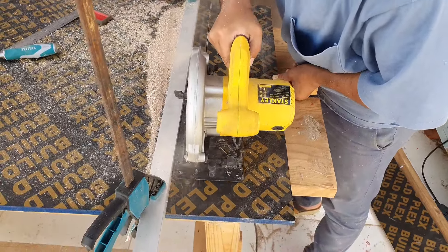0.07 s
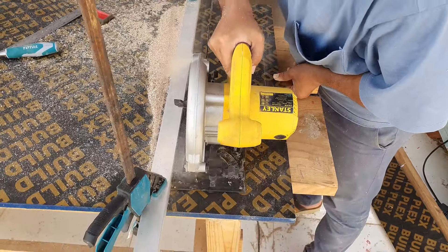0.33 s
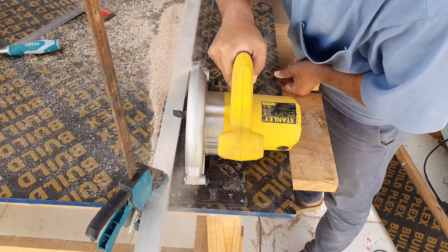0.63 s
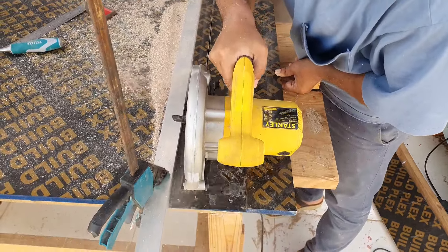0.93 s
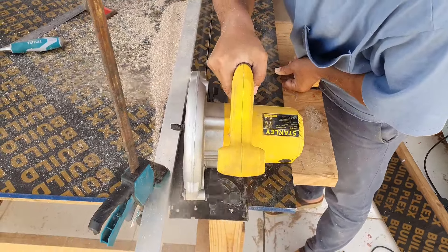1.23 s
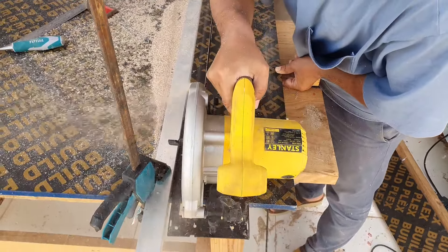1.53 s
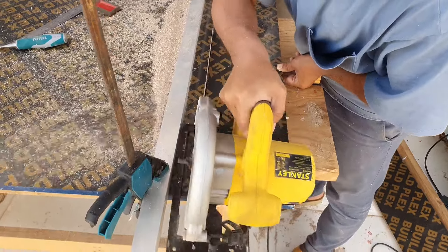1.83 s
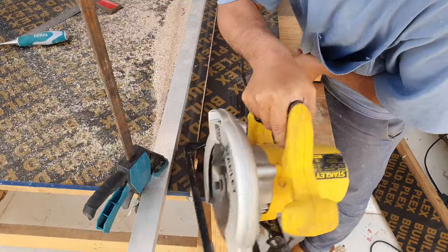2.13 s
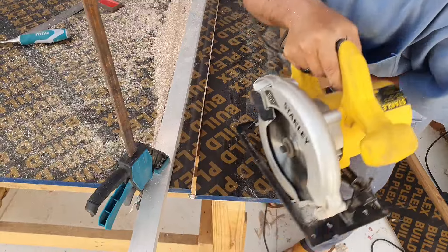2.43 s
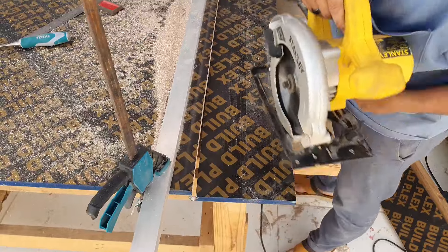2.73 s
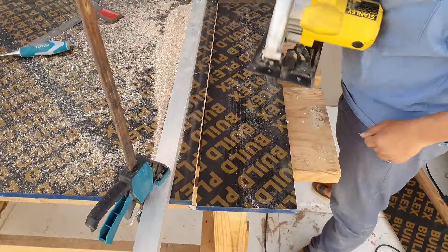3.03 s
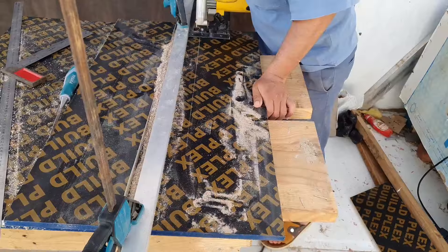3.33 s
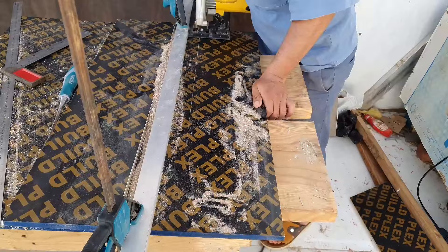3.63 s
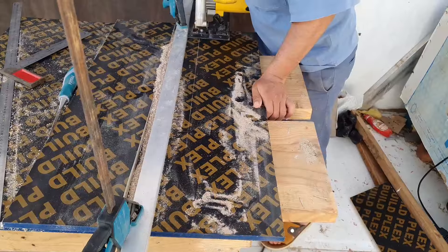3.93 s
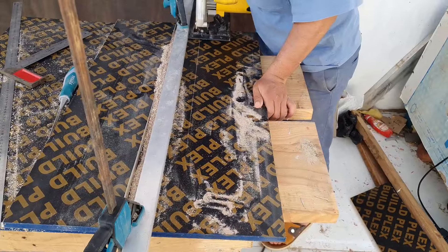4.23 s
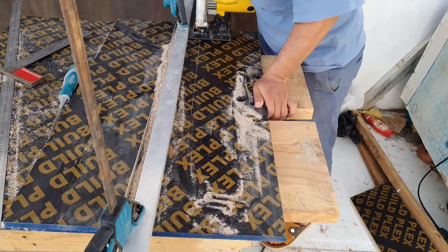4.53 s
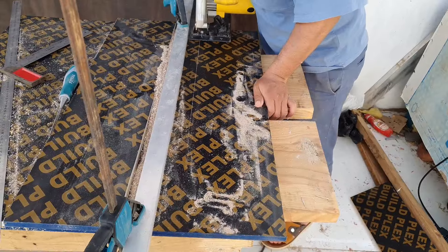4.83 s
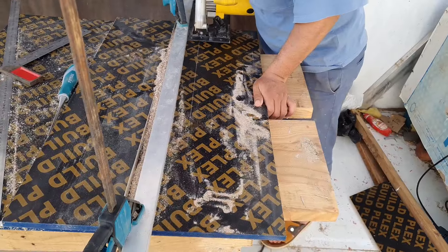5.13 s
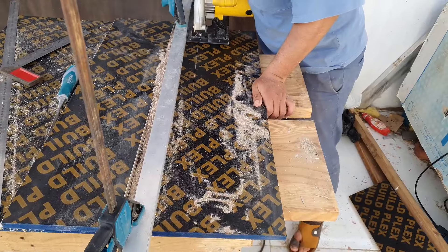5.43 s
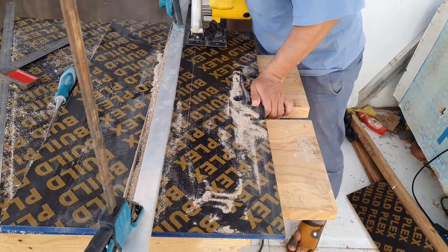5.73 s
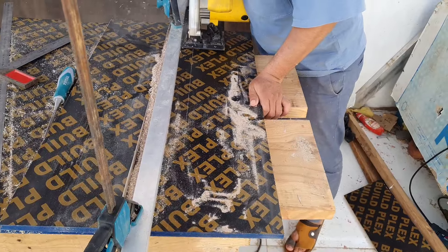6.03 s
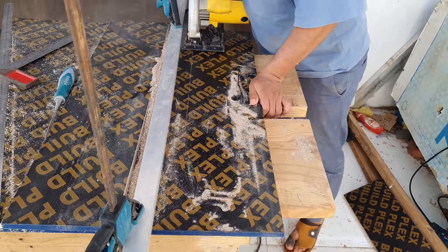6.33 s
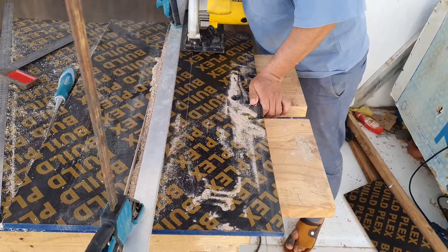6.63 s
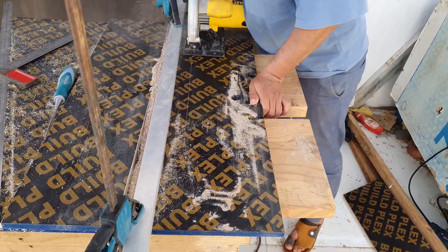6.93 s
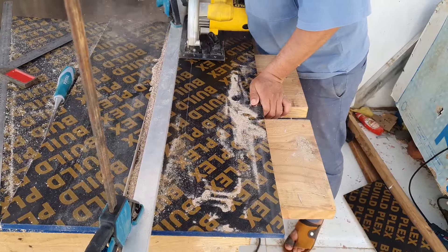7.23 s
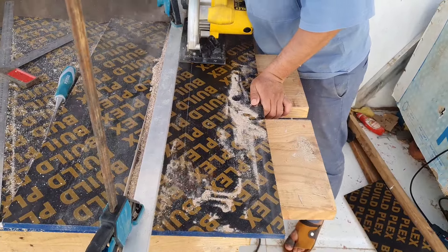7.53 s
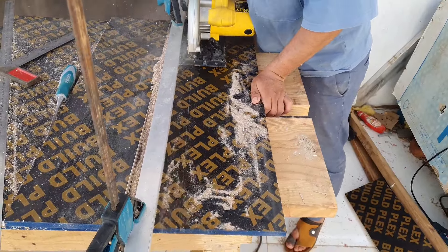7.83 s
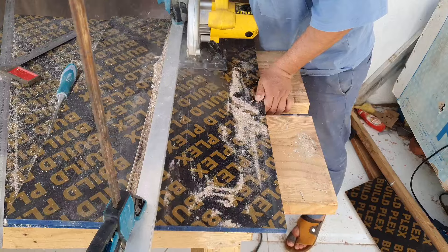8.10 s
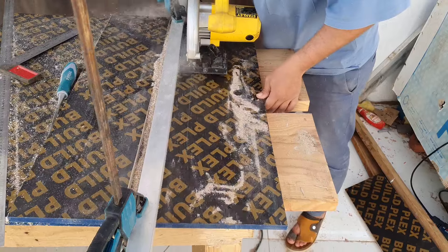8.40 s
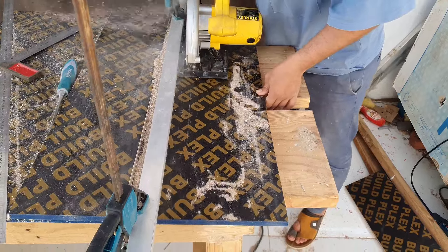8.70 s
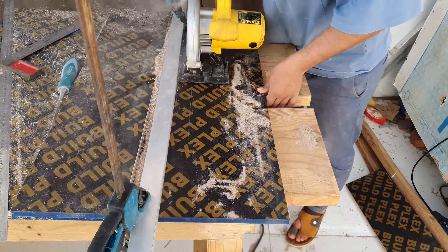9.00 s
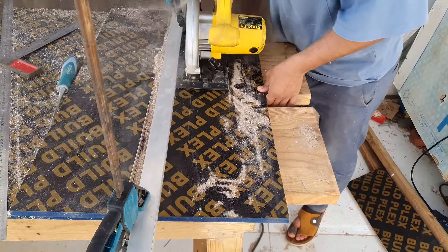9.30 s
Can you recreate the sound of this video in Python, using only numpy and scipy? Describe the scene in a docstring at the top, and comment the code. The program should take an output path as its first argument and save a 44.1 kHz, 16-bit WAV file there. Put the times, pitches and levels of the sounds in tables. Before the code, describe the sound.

An electric circular saw cuts plywood close by, its motor whining over rasping teeth and a ringing steel blade. It leaves the wood with a couple of knocks and slows, its guard rattling. After a few dull bumps, the motor kicks on and races up with grinding gears. The blade bites again and cuts steadily, squealing in bursts as the pitch sinks under load. The workshop adds a short echo.

```python
"""A corded circular saw is cutting plywood: its motor hums, its teeth tear and its steel blade rings.
Near 2 s it leaves the wood with a knock, then slows down while its loose guard rattles.
At 3.2 s the scene jumps to the far end of the sheet. The motor kicks on and races up, its gears grinding.
Near 4.9 s the blade bites in again, and the load drags down the speed of motor, fan and blade together."""
import sys
import numpy as np
from scipy import signal
from scipy.fft import rfft, irfft, next_fast_len
from scipy.io import wavfile
from scipy.ndimage import uniform_filter1d, map_coordinates

SR = 44100
rng = np.random.default_rng(int(sys.argv[2]) if len(sys.argv) > 2 else 0)


def to_wav(sig):
    """Store sig (one row per channel, or 1-D mono) as 16-bit WAV at the path in sys.argv[1].

    Samples outside -1..1 are clipped; the rate is SR.
    """
    pcm = np.clip(np.atleast_2d(sig), -1, 1) * 32767
    pcm = np.round(pcm).astype(np.int16)
    wavfile.write(sys.argv[1], SR, pcm.T)  # frames by channels


N = 417186

JUMP_S, SWITCH_ON_S = 3.2, 3.528  # the second scene begins; the trigger is pulled
GEAR_RATIO, TEETH = 41 / 8, 30  # motor turns for one blade turn; teeth on the blade
MAINS_PULSE_HZ = 100  # the current peaks twice in each mains cycle
USUAL_BITE_DB = -37  # how hard the teeth bite with an ordinary push


def amp(db):
    """Turn decibels into a gain, a number to multiply a sound by."""
    return 10 ** (np.asarray(db) / 20)

def unit(x):
    """Scale x to an average strength (rms) of 1."""
    return x / np.sqrt(np.mean(x ** 2) + 1e-20)

def along(points, hz):
    """Read between rows of (pitch_hz, value), with octaves evenly spaced."""
    pitches, values = np.transpose(points)
    return np.interp(np.log(hz + 1), np.log(pitches + 1), values)

def clock():
    """The time of every sample, in seconds."""
    return np.arange(N) / SR

def curve(points):
    """Join rows of (time_s, value) with straight lines, one value a sample."""
    return np.interp(clock(), *np.transpose(points))

def ramp(start_s, length_s):
    """A gain that climbs from 0 to 1."""
    return np.clip((clock() - start_s) / length_s, 0, 1)

def blow(start_s, level_db, fade_s, rise_s):
    """A gain that rises quickly and dies away, losing 60 dB in fade_s."""
    return amp(level_db - 60 * np.maximum(clock() - start_s, 0) / fade_s) * ramp(start_s, rise_s)

def wobble(rate):
    """A smooth random curve through `rate` new values a second."""
    values = rng.standard_normal(int(N * rate / SR) + 4)
    coarse = np.arange(0, N + 32, 32)
    return np.interp(np.arange(N), coarse, map_coordinates(values, [coarse * rate / SR]))

def filtered(x, response):
    """Turn each frequency in x up or down by the gain response(hz)."""
    size = next_fast_len(N + SR // 4, True)
    return irfft(rfft(x, size) * response(np.fft.rfftfreq(size, 1 / SR)), size)[..., :N]

def coloured(x, spectrum):
    """Shape x by rows of (pitch_hz, level_db), at strength 1."""
    return unit(filtered(x, lambda hz: amp(along(spectrum, hz))))

def resonate(x, notes):
    """Let x ring an object's own notes, rows of (pitch_hz, width_hz, level_db)."""
    def response(hz):
        return sum((-1) ** k * amp(db) * 1j * hz * width / (pitch ** 2 - hz ** 2 + 1j * hz * width)
                   for k, (pitch, width, db) in enumerate(notes))
    return unit(filtered(x, response))

def noise():
    """Fresh white noise."""
    return rng.standard_normal(N)

def tone(cycles):
    """A pure tone of strength 1 that follows a running count of cycles."""
    return np.sqrt(2) * np.sin(2 * np.pi * (cycles + rng.random()))

def throb(turns, depth):
    """A gain that swells once a turn."""
    return 1 + depth * np.cos(2 * np.pi * turns)

def swaying(cycles, turns, depth):
    """A tone that gets louder and higher once a turn (louder and lower for negative turns)."""
    return throb(turns, depth) * tone(cycles + depth * np.sin(2 * np.pi * turns) / (2 * np.pi))

def per_turn(turns, renew_rate):
    """Noise that repeats with every turn of the blade while its pattern slowly changes."""
    steps = 512
    patterns = rng.standard_normal((200, steps))
    position = [clock() * renew_rate, turns % 1 * steps]
    return unit(map_coordinates(patterns, position, order=1, mode="grid-wrap"))

def patchy(x, depth_db):
    """Make narrow bands of pitch in x flare and fade at random."""
    bands = signal.stft(x, nperseg=1024)[2]
    flares = uniform_filter1d(rng.standard_normal(bands.shape), size=2, axis=0)
    flares = uniform_filter1d(flares, size=7, axis=1)
    return unit(signal.istft(bands * amp(depth_db * unit(flares)), nperseg=1024)[1][:N])

def fan(turns, spectrum, mains_depth, turn_depth):
    """Cooling air and the motor's brushes hiss, pulsing with the mains and the gear wheel."""
    air = noise() + .4 * per_turn(turns, renew_rate=3)
    pulsing = air * throb(MAINS_PULSE_HZ * clock(), mains_depth) * throb(turns, turn_depth)
    return patchy(coloured(pulsing, spectrum), depth_db=2.8)

def motor(speed, turns, hum_db, whine_db, sway, slack):
    """The motor hums; its whine sways with each turn of the gear wheel and blurs in slack gears."""
    # the tones in the whine: multiple_of_motor_speed, level_db
    overtones = [(8, 1.5), (16, -1), (19, -22)]
    # how well the housing gives off the hum and the whine: pitch_hz, gain_db
    hum_response = [(240, -82), (292, -62.5), (308, -57), (338, -47.5), (362, -47), (386, -40.5),
                    (405, -39)]
    whine_response = [(3300, 0), (4700, -14), (5200, -4), (5600, 1), (7000, -9)]
    rotor = turns * GEAR_RATIO
    hum = tone(rotor) + amp(-12) * tone(2 * rotor) + amp(-13) * tone(rotor + turns)
    play = (.002 + .036 * slack) * wobble(260)
    whine = sum(amp(db + 1.3 * wobble(12)) * swaying(multiple * (rotor + play), turns, sway)
                for multiple, db in overtones)
    whine = filtered(whine, lambda hz: amp(along(whine_response, hz)))
    hum_gain = amp(hum_db + along(hum_response, GEAR_RATIO * speed) + .8 * wobble(16) + 1.5 * wobble(60))
    return hum_gain * hum + amp(whine_db) * whine

def grabbing_db():
    """The level leaps each time the teeth grab the wood."""
    # the grabs: start_s, extra_db, fade_s
    grabs = [(4.92, 15.5, 0.086), (6.05, 12, 0.024), (6.88, 3, 0.049), (9.41, -1, .1)]
    return sum(db * ramp(start - .02, .036) * np.exp(-np.maximum(clock() - start, 0) / fade)
               for start, db, fade in grabs)

def teeth(turns, steady_gain):
    """The passing teeth make a tone that swells into squeals; the blade's wobble makes it chatter."""
    # the teeth squeal: start_s, end_s, tone_db, octave_db
    squeals = [(0, 0.173, -46.5, -40), (.3, .72, -51, -45), (0.906, 1.0, -55, -43), (1.3, 1.38, -55, -43),
               (1.55, 1.88, -62, -34.5), (2.28, 2.866, -48, -74), (2.876, 3.05, -50, -74),
               (4.895, 5.02, -45, -52), (5.06, 5.45, -46, -49), (5.54, 5.82, -47, -45.5),
               (6.0, 6.38, -42, -49), (6.66, 6.77, -46, -43), (6.85, 6.93, -45, -36.5),
               (6.955, 6.99, -49, -37), (7.018, 7.055, -50, -34), (7.09, 7.14, -46, -36.5),
               (7.18, 7.58, -41, -51), (7.654, 7.8, -45, -60.5), (7.82, 7.993, -51, -38.5),
               (8.1, 8.27, -44, -38.5), (8.3, 8.45, -59, -48), (8.707, 8.92, -41, -42),
               (9.14, 9.46, -42, -51)]
    # the blade scrapes the side of its slot once a turn: start_s, end_s, level_db
    scrapes = [(5.05, 5.898, -39.5), (6.103, 6.858, -37.5)]
    tone_gain = octave_gain = steady_gain
    for start, end, tone_db, octave_db in squeals:
        gate = ramp(start, .016) * (1 - ramp(end, .017))
        tone_gain = tone_gain + gate * amp(tone_db)
        octave_gain = octave_gain + gate * amp(octave_db)
    passes = TEETH * turns
    first = tone_gain * amp(1.8 * wobble(25)) * swaying(passes + .05 * wobble(70), -turns, .3)
    second = octave_gain * amp(2.5 * wobble(24)) * swaying(2 * passes + .07 * wobble(110), -turns, .3)
    fourth = octave_gain * amp(-12) * tone(4 * passes + .23 * wobble(130))
    scrape_gain = sum(amp(db) * ramp(start, .062) * (1 - ramp(end, .067)) for start, end, db in scrapes)
    scrape = unit(amp(3 * wobble(30)) * swaying(2 * passes + .11 * wobble(110), -turns, .85))
    return amp(grabbing_db()) * (first + second + fourth) + scrape_gain * scrape

def tooth_strikes(turns, uneven_db, scatter_db):
    """One click a tooth: each tooth has its own height, each chip its own size."""
    height = rng.standard_normal(TEETH)
    chip = rng.standard_normal(N // 8)
    tooth = np.arange(1, int(turns[-1] * TEETH))
    at = np.interp(tooth, turns * TEETH, np.arange(N))
    size = amp(uneven_db * height[tooth % TEETH] + scatter_db * chip[tooth])
    nearby = at.astype(int)[:, None] + np.arange(-3, 5)  # a click can fall between samples
    pulses = (size - size.mean())[:, None] * np.sinc(nearby - at[:, None])
    return unit(np.bincount(np.clip(nearby, 0, N - 1).ravel(), pulses.ravel(), N))

def splinters(per_second, spread_db):
    """Splinters tick against the guard at random, a few much harder than the rest."""
    # the colour of a tick: pitch_hz, level_db
    spectrum = [(500, -20), (1500, -2.5), (2200, 5), (3500, -0.5), (6500, -1.5), (9000, -21), (15000, -20)]
    fade_s = .0061
    when, size = rng.random((int(per_second * N / SR), 2)).T
    hits = np.bincount((when * N).astype(int), amp(-spread_db * np.log(size + .01)), N)
    t = np.arange(SR // 100) / SR
    tick = rng.standard_normal(len(t)) * amp(-60 * t / fade_s)
    return coloured(signal.oaconvolve(hits, tick)[:N], spectrum)

def blade_ring(drive, notes, sway_db):
    """Each note of the steel blade swells and fades by itself as the wood shifts its grip."""
    ring = 0
    for k, (hz, width, db) in enumerate(notes):
        note = signal.lfilter(*signal.iirpeak(hz, hz / width, SR), drive)
        ring += (-1) ** k * amp(db + sway_db * wobble(20)) * note
    return unit(ring)

def cutting(turns, rasp_spectrum, blade_notes, dust_spectrum, rasp_db, ring_db, dust_db, buzz_db):
    """Teeth tear the wood, ring the blade and throw a spray of dust."""
    # tones from the uneven teeth: multiple_of_blade_speed, level_db
    buzz_tones = [(18, -1), (23, -4.5), (27, -2), (28, -1.5), (29, -5), (31, -10), (33, -8), (42, -3)]
    grain = amp(.8 * wobble(22) + .6 * wobble(70))  # hard and soft spots in the wood
    gouging = noise() + .55 * per_turn(turns, renew_rate=5)  # the same teeth come round each turn
    tearing = tooth_strikes(turns, uneven_db=.5, scatter_db=1) + .99 * gouging * throb(turns, .17)
    fibres = patchy(coloured(tearing, rasp_spectrum), depth_db=4)
    rasp = fibres + amp(-9.5) * splinters(per_second=400, spread_db=3.5)
    buzz = sum(amp(db + 2.5 * wobble(7)) * tone(multiple * turns + .064 * wobble(70))
               for multiple, db in buzz_tones)
    ring = blade_ring(gouging, blade_notes, sway_db=3)
    spray = noise() * amp(.83 * wobble(900)) * throb(turns, .071)
    dust = coloured(spray, dust_spectrum) * amp(1.6 * wobble(12))
    return grain * (amp(rasp_db) * rasp + amp(buzz_db) * buzz + amp(ring_db) * ring + amp(dust_db) * dust)

def near_cut():
    """The saw finishes a cut, comes free and coasts with a rattling guard."""
    # a harder push slows the blade: time_s, turns_per_s
    speeds = [(0, 60.2), (.22, 59.2), (.55, 55.85), (.77, 56.05), (1.06, 60.55), (1.24, 60.65), (1.4, 59.1),
              (1.71, 56.8), (2.29, 57.6)]
    # how hard the teeth bite and the loaded gears whine: time_s, level_db
    bite = [(0, -40), (.35, -38), (.65, -37), (1.0, -39), (1.4, -38), (1.8, -37.5), (1.91, -39),
            (1.95, -40.5), (2.1, -43)]
    whine = [(0, -47), (.22, -56), (.28, -34), (.42, -39.5), (.58, -42), (.95, -47), (1.3, -51),
             (1.56, -36), (1.76, -33.5), (1.9, -39), (2.3, -75)]
    # the colours of fan air, tearing wood and dust: pitch_hz, level_db
    air_spectrum = [(150, -23), (400, -5.5), (600, -5), (850, -9), (1150, -3.5), (1500, -3.5), (2100, -0.5),
                    (2750, -9), (3300, -8), (4500, -6.5), (6700, -10), (7700, -23), (10000, -8.5),
                    (15000, -23.5)]
    rasp_spectrum = [(150, -19.5), (330, -25), (620, -1.5), (800, -5.5), (950, -58), (1400, 0.5), (2000, 7),
                     (2650, -1.5), (3050, -7), (3900, -3.5), (5200, -4.5), (7000, -12.5), (9000, -9)]
    dust_spectrum = [(4000, -42), (7000, -4), (8600, -10), (9700, 9), (11000, 3), (12500, -4), (15500, -17)]
    # the blade's own notes: pitch_hz, width_hz, level_db
    blade_notes = [(1403, 15, -14), (2353, 110, -3), (2560, 88, -7.5), (2730, 50, -6), (3260, 35, -3),
                   (3440, 73, -1.5), (3590, 80, -3.5), (3880, 28, 0), (4066, 36, -6), (4690, 150, -5.5),
                   (5150, 106, -8), (5400, 50, -13), (5940, 61, -10), (6180, 46, -3), (6610, 74, -7.5),
                   (7900, 70, -1.5), (8300, 45, -6), (9800, 120, -0.5), (10000, 40, -14), (11150, 91, -8)]
    exit_s, switch_off_s, coast_s = 1.74, 2.295, 3.81
    speed = curve(speeds) * np.exp(-np.maximum(clock() - switch_off_s, 0) / coast_s)
    turns = np.cumsum(speed * (1 + .00178 * wobble(20))) / SR
    bite_db = curve(bite) - USUAL_BITE_DB
    free, coasting = ramp(exit_s, .43), ramp(switch_off_s, .83)
    draught = (speed / speed[0]) ** 2.15  # the fan's air dies with the speed
    air = draught * amp(-39) * fan(turns, air_spectrum, .21 * (1 - coasting), .1 + .06 * coasting)
    wood = cutting(turns, rasp_spectrum, blade_notes, dust_spectrum,
                   rasp_db=-33 + bite_db, ring_db=-33 + .99 * bite_db,
                   dust_db=-34 + 3 * bite_db, buzz_db=-60 + bite_db)
    loose_parts = guard(turns) + free * whirr(turns)
    drive = motor(speed, turns, hum_db=5 - 9 * ramp(.28, .6), whine_db=curve(whine),
                  sway=.37, slack=.12 + .97 * free)
    saw = air + loose_parts + drive + teeth(turns, amp(-53) * (1 - free))
    return (saw + wood * (1 - ramp(2.003, .14))) * (1 - ramp(JUMP_S - .004, .0078))

def background():
    """The room's low, wavering rumble and a faint hiss, in stereo."""
    # the rumble's strength: time_s, level_db
    levels = [(0, -61.5), (1.4, -56.5), (2.3, -66.5), (3.1, -61.5), (3.5, -65), (5.6, -55), (6.1, -62.5),
              (8.1, -62), (9.46, -76)]
    # its colour: pitch_hz, level_db
    spectrum = [(25, -39), (60, 5), (100, 6), (200, -5), (500, -21), (1500, -48)]
    rumble = amp(curve(levels) + 4.9 * wobble(6.7)) * coloured(rng.standard_normal((2, N)), spectrum)
    hiss = coloured(rng.standard_normal((2, N)), [(200, -2), (1500, 3), (6000, 4.5), (9000, -36)])
    return rumble + amp(-64) * hiss

def metal_notes():
    """The steel blade and its guard ring with brief, high metallic notes."""
    # the ringing notes: start_s, end_s, pitch_hz, level_db
    notes = [(0.17, .36, 6207, -45), (.31, .42, 3450, -36.5), (.46, .57, 3390, -37), (.57, .72, 3372, -39),
             (.76, .88, 3810, -45), (1.1, 1.3, 2575, -41), (1.55, 1.84, 3419, -35), (1.57, 1.82, 6212, -42),
             (1.6, 1.87, 6545, -49), (1.968, 2.3, 2614, -45), (2.54, 2.64, 2700, -52),
             (3.07, 3.16, 2600, -51), (4.95, 5.9, 5729, -49), (5.45, 5.7, 6336, -48),
             (4.92, 5.7, 9410, -52), (5.48, 5.62, 2020, -43), (6.98, 7.05, 3430, -40),
             (7.17, 7.4, 3425, -41), (7.07, 7.19, 5101, -37.5), (7.53, 7.62, 3820, -41),
             (7.75, 7.95, 3790, -46), (7.64, 7.76, 2047, -39), (7.9, 8.02, 3240, -41),
             (8.66, 8.93, 3785, -40), (9.24, 9.46, 2052, -41), (9.24, 9.4, 1900, -40),
             (9.372, 9.46, 1863, -31.5)]
    rise_s, fall_s = .016, .069
    ringing, jitter = np.zeros(N), .07 * wobble(120)
    for start, end, hz, db in notes:
        gate = ramp(start, rise_s) * (1 - ramp(end, fall_s))
        ringing += amp(db) * gate * tone(hz * clock() + jitter)
    return ringing * amp(1.8 * wobble(22) - 1)

def thuds(events, spectrum, channels):
    """Short dull blows, each a puff of noise that dies away."""
    gain = sum(blow(start, db, fade, rise_s=.0034) for start, db, fade in events)
    return gain * coloured(rng.standard_normal((channels, N)), spectrum)

def bumps():
    """Bumps on the microphone and the bench make deep thuds, in stereo."""
    # the bumps: start_s, level_db, fade_s
    events = [(.761, -40, 0.15), (1.197, -42, 0.22), (1.992, -36, 0.12), (3.205, -27, 0.24),
              (3.27, -39, 0.51), (3.335, -32, 0.42), (3.387, -34, 0.17), (3.519, -36, 0.22),
              (3.62, -37, 0.57), (3.72, -39, 0.32), (4.321, -37, 0.33), (4.47, -38, 0.16),
              (4.72, -40, 0.24), (4.879, -45, 0.41), (5.0, -37, .15), (5.362, -44, 0.59), (6.143, -44, .2),
              (6.763, -40, 0.26)]
    # their colour: pitch_hz, level_db
    spectrum = [(25, -34), (60, -5), (105, -1.5), (200, -16), (400, -19.5), (800, -45), (3000, -53)]
    return amp(-2.5) * thuds(events, spectrum, channels=2)

def whirr(turns):
    """Out of the wood the gears run loose, and their rough tones sink with the speed."""
    # the gears' tones: multiple_of_blade_speed, level_db, end_s
    tones = [(11, -57, 2.82), (54, -49.5, 2.5), (36, -55, 2.76), (76, -64, 2.65)]
    return sum(amp(db + 3 * wobble(90)) * (1 - ramp(end, .19)) * tone(multiple * turns + .22 * wobble(220))
               for multiple, db, end in tones)

def knocks():
    """The saw's base plate and guard knock on the sheet."""
    # the knocks: start_s, level_db, fade_s
    events = [(1.876, -23.5, 0.22), (2.128, -27.5, 0.36), (2.32, -42, 0.073), (3.325, -36.5, 0.06),
              (3.385, -49, 0.18), (3.517, -30, 0.091)]
    spectrum = [(90, -12), (200, 3), (450, 9), (1000, .5), (1700, 4.5), (3000, .5), (8000, -18)]
    return amp(-7.5) * thuds(events, spectrum, channels=1)[0]

def guard(turns):
    """Splinters tick inside the loose guard; then it brushes the blade once a turn and rattles on it."""
    # the guard strikes the blade: start_s, level_db
    hits = [(2.726, -40), (2.811, -31), (2.9065, -35), (2.943, -28.5), (2.9604, -36), (2.9798, -32),
            (2.9983, -34), (3.0207, -34), (3.0367, -34), (3.0581, -36), (3.0766, -33), (3.121, -33),
            (3.137, -33), (3.1569, -32), (3.1858, -32)]
    # the guard's own notes: pitch_hz, width_hz, level_db
    notes = [(1720, 120, 0), (2640, 69, -6), (4170, 260, -8), (6350, 110, -1)]
    brushing = amp(-52) * ramp(2.7, .5) * unit(throb(turns, .86) ** 4 * amp(3.6 * wobble(50)))
    rattle = sum(blow(start, db, fade_s=.03, rise_s=.0017) for start, db in hits)
    grit = amp(-47.5) * ramp(1.96, .1) * (1 - ramp(2.5, .5)) * splinters(per_second=130, spread_db=5.5)
    return (brushing + rattle) * resonate(noise(), notes) + grit

def clinks():
    """The base plate, guard and clamps clink, each time on one rough metal note."""
    # the clinks: start_s, pitch_hz, level_db, fade_s
    events = [(1.965, 3490, -31, .12), (2.03, 2530, -33, 0.21), (2.318, 1500, -34.5, .1),
              (3.23, 4000, -54, 0.22), (3.272, 3250, -58, 0.23), (3.335, 3820, -52, 0.14),
              (3.385, 5770, -54, 0.23), (3.588, 1430, -24.5, 0.26)]
    return sum(blow(start, db, fade, rise_s=.006) * tone(hz * clock() + .14 * wobble(250))
               for start, hz, db, fade in events)

def kick():
    """At switch-on a rush of current jolts the housing with each mains pulse and chatters the gears."""
    # the housing's own notes: pitch_hz, width_hz, level_db
    notes = [(185, 27, -23.5), (304, 7.6, -16.5), (389, 11, -2.5), (464, 25, -0.5), (571, 10, -9)]
    def surge(hold_s, fall_db_per_s=76):
        fading_s = np.maximum(clock() - SWITCH_ON_S - hold_s, 0)
        return ramp(SWITCH_ON_S, .0047) * amp(-fall_db_per_s * fading_s)
    jolts = unit(throb(MAINS_PULSE_HZ * clock(), 1) ** 8)
    housing = resonate(jolts * (1 + .5 * wobble(150)) + 4 * noise(), notes)
    # the colour of the chattering gears: pitch_hz, level_db
    spectrum = [(400, -13), (700, 0.5), (1050, -1), (1450, 11.5), (1800, 4), (2400, 4), (4000, -5),
                (6800, -19.5), (9000, -60)]
    chatter = coloured(noise() * (1 + .29 * jolts), spectrum)
    return amp(-25) * surge(hold_s=.018) * housing + amp(-27.5) * surge(hold_s=.097) * chatter

def far_cut():
    """The saw races up in free air, then the blade meets the wood, which drags the speed down."""
    # a harder push slows the blade: time_s, turns_per_s
    speeds = [(4.9, 77.1), (5.43, 79.25), (5.85, 78.2), (6.05, 76.7), (6.33, 74.1), (6.58, 75.15),
              (6.75, 75.2), (7.12, 70.85), (7.5, 68.25), (7.8, 68.1), (8.4, 64.9), (8.9, 62.7),
              (9.46, 62.15)]
    # how hard the teeth bite and the loaded gears whine: time_s, level_db
    bite = [(4.9, -36), (5.3, -42), (5.55, -33.5), (5.85, -36.5), (6.3, -36.5), (6.53, -40.5), (6.88, -35),
            (7.1, -35), (7.45, -36.5), (7.64, -37.5), (7.9, -33), (8.1, -35), (8.45, -35.5), (8.8, -34.5),
            (9.2, -35), (9.46, -33.5)]
    whine = [(4.3, -48), (5.5, -53), (5.75, -46.5), (6.2, -47), (6.95, -43.5), (7.3, -49), (7.9, -57),
             (8.3, -39.5), (8.5, -48), (8.65, -37), (9.05, -38.5), (9.32, -47), (9.46, -41)]
    # the motor's hum swells and fades: time_s, extra_db
    hum = [(4.3, 3), (4.75, -2), (5.1, -2.5), (5.7, -2), (6.3, 0.5), (6.68, 2), (6.85, 2), (6.98, -4.5),
           (7.4, 2.5)]
    # the colours of fan air, tearing wood and dust: pitch_hz, level_db
    air_spectrum = [(150, -16), (260, -10), (480, 4.5), (700, -6), (1100, -2), (1600, 1.5), (1830, 0),
                    (1960, -4.5), (2300, -5.5), (2650, -2.5), (2850, -2.5), (3150, -1.5), (3680, -6),
                    (4200, -1), (4650, -2.5), (4950, -4.5), (5220, 3), (5600, -8), (6800, -7.5),
                    (8000, -17.5), (12300, -11.5), (15000, -28)]
    rasp_spectrum = [(150, -38), (350, -14.5), (680, -2.5), (820, -47), (1060, -16), (1300, 2), (1650, -3),
                     (2000, 1), (2300, -1.5), (2700, -8.5), (3050, -6), (4200, -1), (6000, -10),
                     (9000, -13)]
    dust_spectrum = [(4000, -39), (7000, 5), (9500, 18.5), (12500, 19), (14000, -24.5), (15500, -44.5)]
    # the blade's own notes: pitch_hz, width_hz, level_db
    blade_notes = [(1224, 29, -7), (1390, 37, 4), (1548, 50, -2.5), (1784, 83, -0.5), (2062, 38, 1),
                   (2350, 110, -7), (2624, 150, -3.5), (3220, 45, -3.5), (3473, 85, -2.5), (3850, 34, -4.5),
                   (4050, 27, -7), (4460, 85, -7.5), (5180, 58, -6), (6100, 72, -9.5), (6800, 44, -14.5),
                   (9130, 200, -12), (10960, 150, -11)]
    entry_s, free_turns_per_s, half_speed_s = 4.885, 89.5, .226
    running_s = np.maximum(clock() - SWITCH_ON_S, 0)
    run_up = free_turns_per_s * running_s / (running_s + half_speed_s)
    speed = np.where(clock() < entry_s, run_up, curve(speeds))
    turns = np.cumsum(speed * (1 + .000859 * wobble(20))) / SR
    touching, sunk = ramp(entry_s, .023), ramp(entry_s, 2)  # the blade takes a while to sink in
    bite_db = curve(bite) - USUAL_BITE_DB
    draught = np.minimum(speed / 60, 1) ** 2.2  # the fan needs speed to move air
    air_db = -31 - 4.9 * ramp(5.3, 2.8)  # the slot in the wood slowly muffles it
    air = draught * amp(air_db) * fan(turns, air_spectrum, mains_depth=.13, turn_depth=.059)
    wood = cutting(turns, rasp_spectrum, blade_notes, dust_spectrum,
                   rasp_db=-34.5 + .67 * grabbing_db() + bite_db - 4.2 * (1.5 - sunk),
                   ring_db=-36 + bite_db - 22 * (1 - sunk),
                   dust_db=-42 + .16 * bite_db, buzz_db=-46 + .5 * bite_db - 2.8 * (1.5 - sunk))
    drive = motor(speed, turns, hum_db=curve(hum), whine_db=curve(whine),
                  sway=.41, slack=.073 + .85 * (1 - ramp(3.8, .84)))
    saw = air + grind(turns) + drive + teeth(turns, amp(-52.5) * touching)
    return (saw + wood * touching) * ramp(SWITCH_ON_S, .0094)

def grind(turns):
    """As the motor races up, the slack gears grind at a rising pitch and ring their case."""
    # the grinding's strength: time_s, level_db
    levels = [(3.62, -44), (3.73, -32), (3.79, -33), (3.82, -37), (3.87, -30.5), (3.92, -41), (4.05, -38),
              (4.17, -34.5), (4.26, -41), (4.5, -39), (4.9, -75)]
    # how the gear case rings: pitch_hz, gain_db
    case_response = [(1500, -5), (1850, 3), (2100, -3), (2400, -5), (2630, 5.5), (2900, -6), (4900, -1),
                     (5250, 9), (5550, -13)]
    contacts = 8 * GEAR_RATIO * turns  # gear teeth meet 8 times a motor turn
    first = tone(contacts + .3 * wobble(330))
    octave = tone(2 * contacts + .3 * wobble(330))
    clash = unit(throb(turns, .5) ** 2 * amp(3 * wobble(160)))
    gears = amp(curve(levels)) * clash * (first + amp(-8) * ramp(3.85, .15) * octave)
    return filtered(gears, lambda hz: amp(along(case_response, hz)))

def strain():
    """Under heavy load the motor's coils hum at twice the mains pulse rate."""
    loaded = ramp(7.09, .54) * (1 - ramp(8.7, .21))
    return amp(-59 + 1.4 * wobble(7.8)) * loaded * tone(2 * MAINS_PULSE_HZ * clock())

def workshop(x):
    """Bass reaches left and right alike; treble comes scattered from bench and walls."""
    # how long the echo takes to lose 60 dB: pitch_hz, fade_s
    echo_times = [(200, 0.46), (2000, 0.2), (10000, 0.23)]
    # how alike left and right are: pitch_hz, likeness (1 = the same)
    likeness = [(130, 0.91), (300, 0.99), (700, 0.92), (1400, 0.66), (2400, 0.59), (3300, 0.19),
                (7000, -0.097), (15000, -0.13)]
    hz, t, bands = signal.stft(rng.standard_normal((2, SR // 5)), SR, nperseg=256)
    fading = amp(-60 * t / along(echo_times, hz)[:, None])
    tail = signal.istft(bands * fading, SR, nperseg=256)[1][0]
    echo = signal.fftconvolve(x, tail / np.linalg.norm(tail))[:N]
    def spread(hz):
        return np.arccos(np.clip(along(likeness, hz), -1, 1)) / 2
    middle = filtered(x, lambda hz: np.cos(spread(hz)))
    side = filtered(echo, lambda hz: np.sin(spread(hz)))
    return np.array([middle + side, middle - side])

def scene():
    """Both cuts sound in the workshop, over rumble, hiss and bumps."""
    knocking = knocks()
    backdrop = background() + bumps()
    saw = near_cut() + far_cut() + kick() + metal_notes() + strain() + knocking + clinks()
    return amp(.5) * workshop(saw) + backdrop

def record(dry):
    """The microphone's opening cuts a notch in the treble; nothing passes above top_hz."""
    # the microphone's response: pitch_hz, gain_db
    response = [(6900, 0), (7500, -2.5), (8000, -12), (8600, -2.5), (9300, -5.5)]
    top_hz = 15700
    return filtered(dry, lambda hz: amp(along(response, hz)) * (hz < top_hz))


dry = scene()
out = record(dry)
to_wav(out)
```